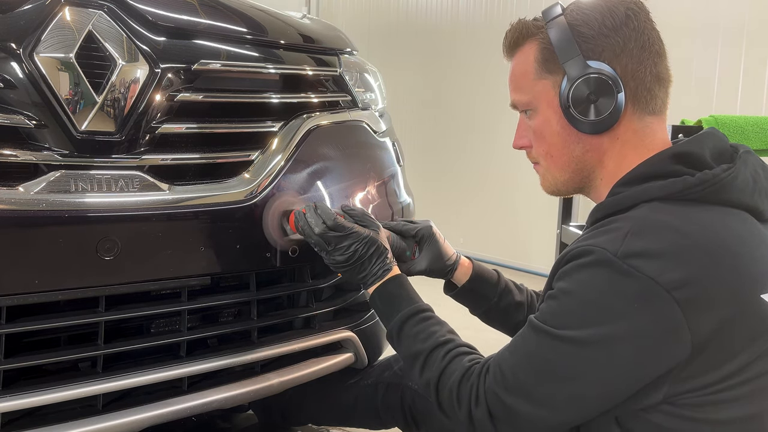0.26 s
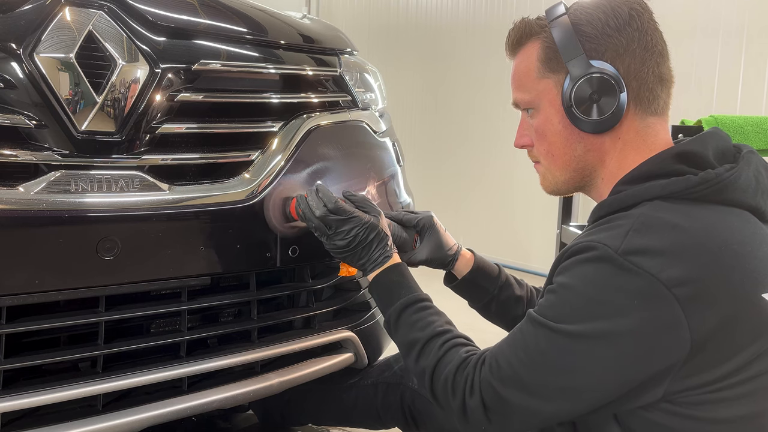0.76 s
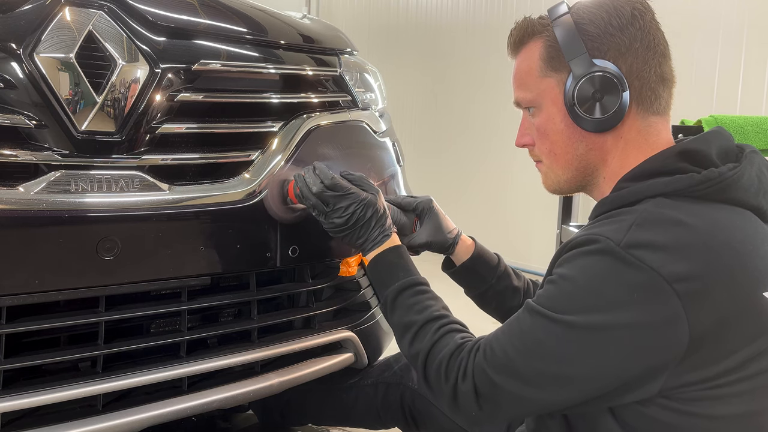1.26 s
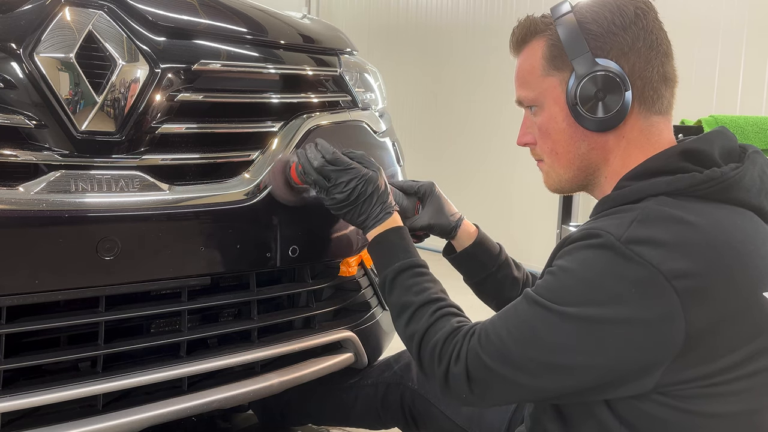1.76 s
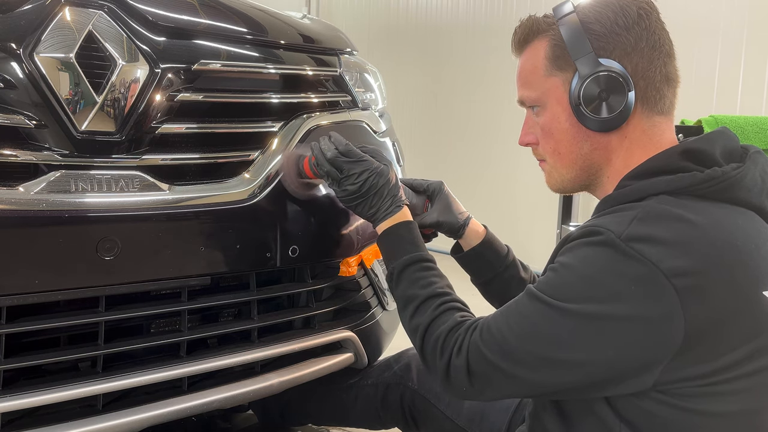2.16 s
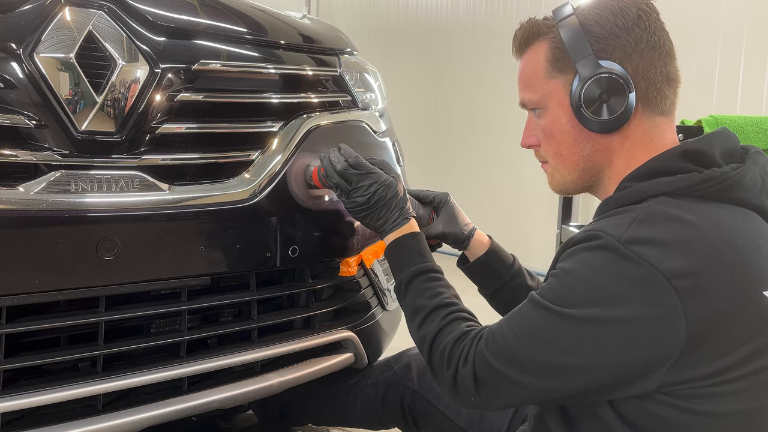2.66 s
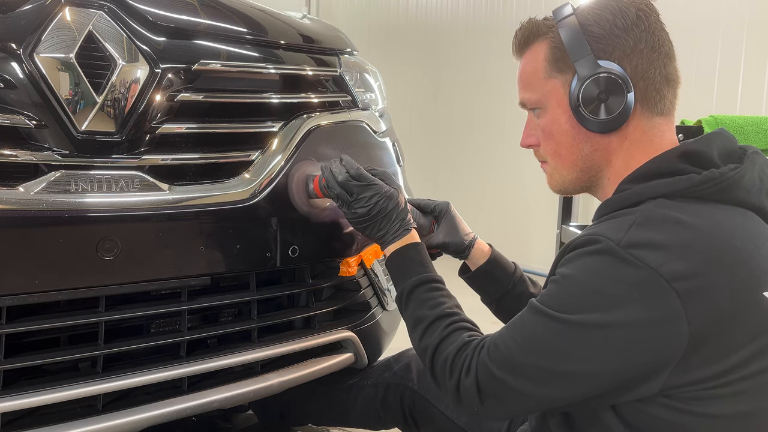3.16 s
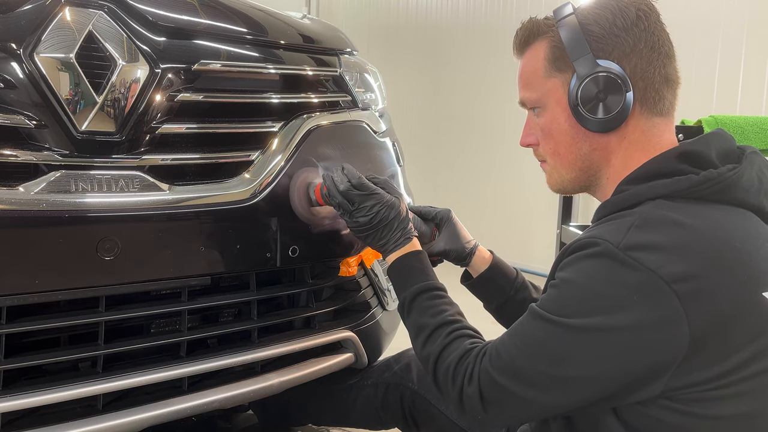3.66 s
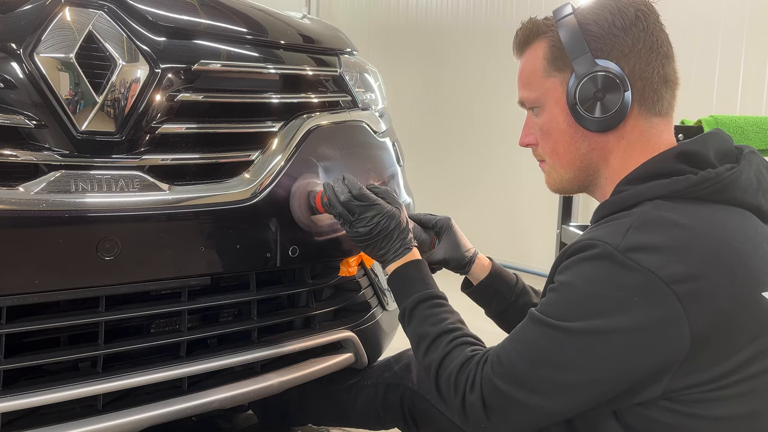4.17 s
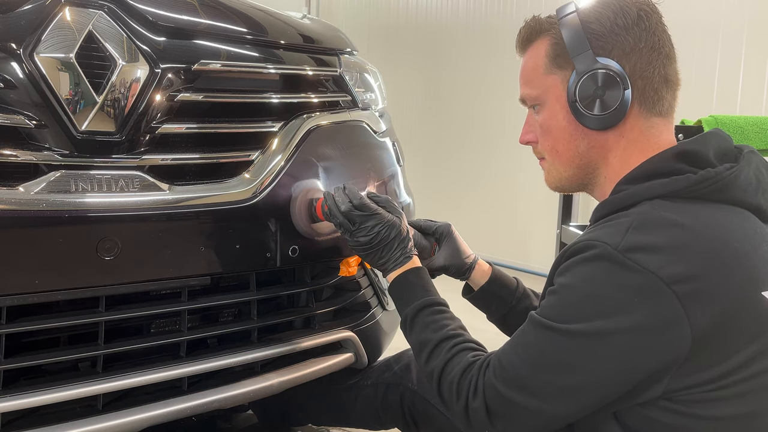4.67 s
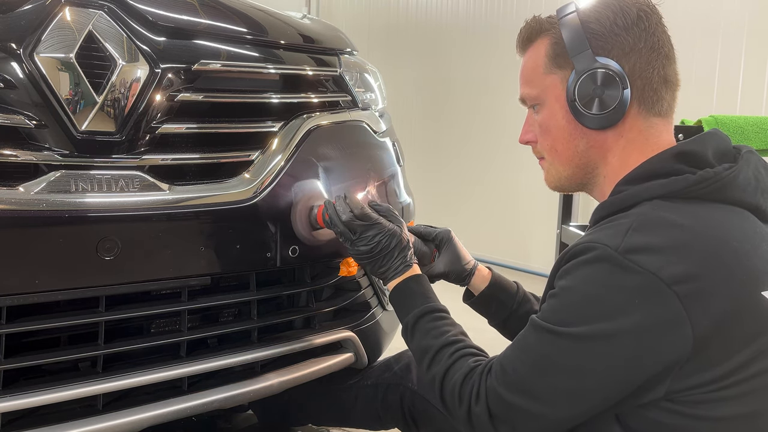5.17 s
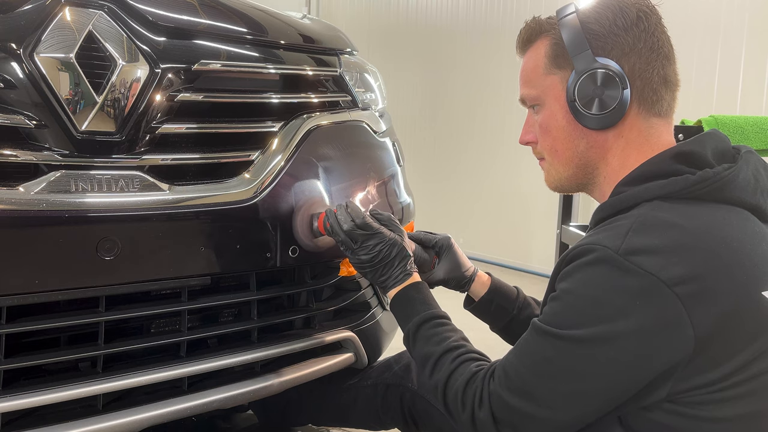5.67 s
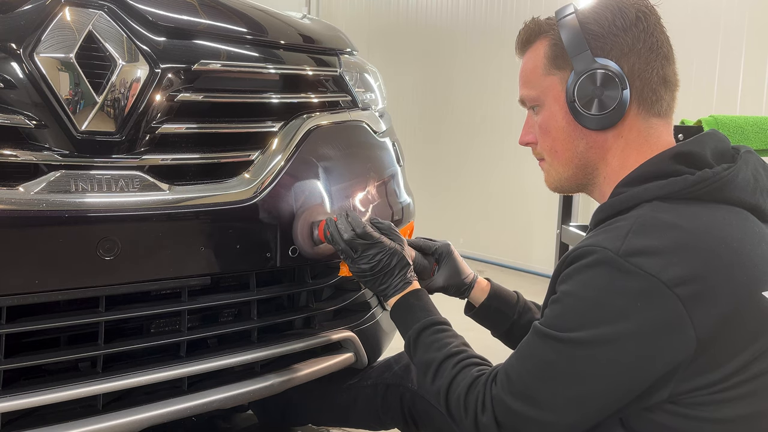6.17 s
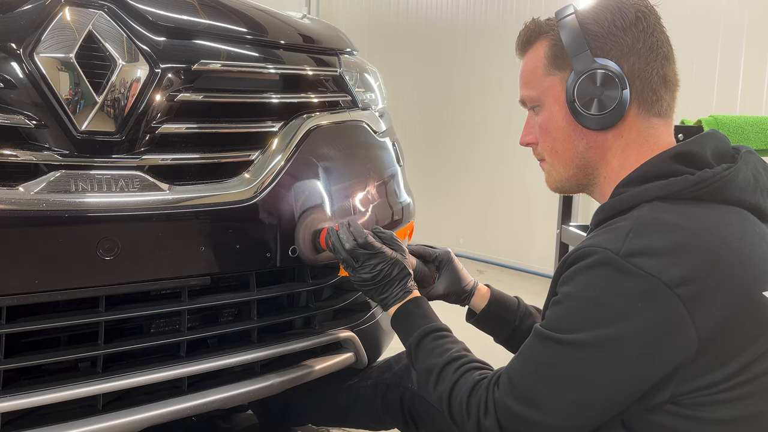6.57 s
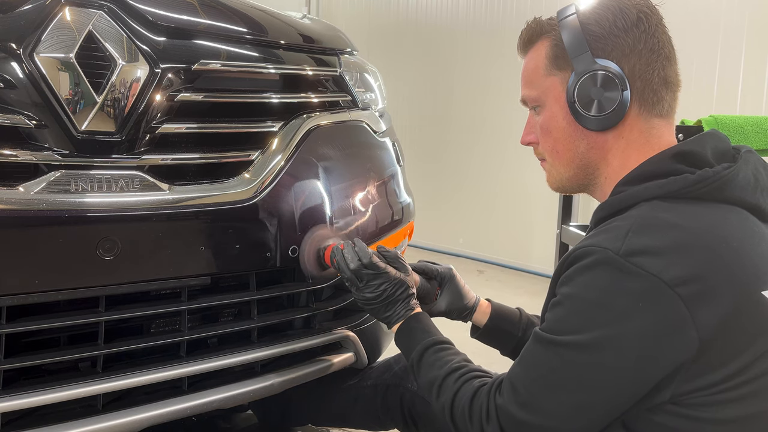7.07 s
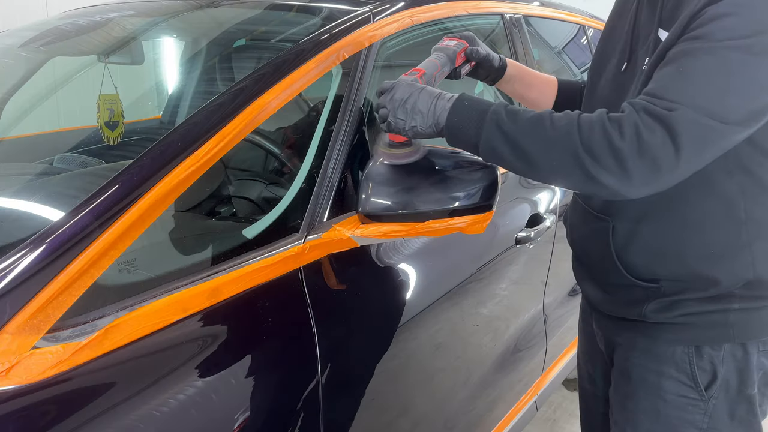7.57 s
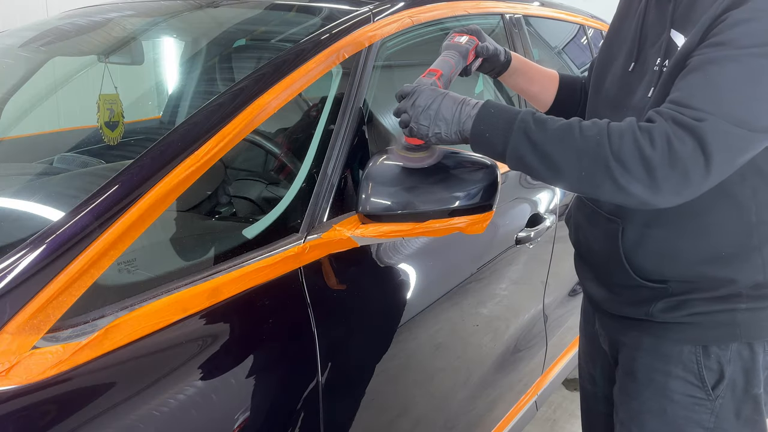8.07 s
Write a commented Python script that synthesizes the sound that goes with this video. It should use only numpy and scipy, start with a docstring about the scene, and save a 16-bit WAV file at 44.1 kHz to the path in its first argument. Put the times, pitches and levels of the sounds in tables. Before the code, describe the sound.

Close by in a garage, a small electric polisher works on car paint with a steady high whine, a rush of air from its vents and a fine gear buzz. The foam pad rubs rapidly against the bumper, and the low hum grows and eases as the pressure changes. For the last moment the tool is on the door mirror, where it sounds quieter, thinner and a touch lower in pitch, still running.

```python
"""A hand-held polisher whines on a car's bumper, then runs slower and lighter on the door mirror.
Its motor sings at the slot-passing frequency and drives an eccentric spindle through a gear pair.
The rotating unbalance hums, the gears buzz and tick, and the foam pad scrubs the paint once an orbit.
Turbulent cooling air hisses and whistles in the vents; the garage rumbles faintly underneath."""
import sys
import numpy as np
from scipy import signal
from scipy.fft import rfft, irfft, next_fast_len
from scipy.io import wavfile
from scipy.ndimage import uniform_filter1d

SR = 44100
rng = np.random.default_rng(int(sys.argv[2]) if len(sys.argv) > 2 else 0)


def log_audio(samples):
    """Write samples as a 16-bit WAV file to the path given in sys.argv[1]."""
    # one column per channel
    frames = np.atleast_2d(samples).T
    # limit to full scale, then quantise
    limited = np.clip(frames, -1, 1)
    pcm = np.round(limited * 32767).astype(np.int16)
    wavfile.write(sys.argv[1], SR, pcm)


N = 367353
T = np.arange(N) / SR
PINION_TEETH, WHEEL_TEETH, MOTOR_SLOTS = 8, 25, 12

# Slot-passing frequency of the motor: time_s, pitch_hz
SLOT_PITCH = [(0.25, 3262), (0.6, 3279), (2.1, 3285), (3.2, 3279), (4.0, 3291), (5.8, 3290), (7.35, 3274),
              (7.46, 3246), (7.95, 3216)]
# Distance of the pad from the stiff trim (0 = at the trim): time_s, reach_fraction
PAD_REACH = [(0.1, 0.65), (.5, 0.58), (.9, 0.41), (1.35, .22), (1.85, 0.05), (2.65, 0.15), (3.1, 0.16),
             (4.0, 0.26), (4.9, 0.43), (6.2, .62), (7.03, 0.96), (7.3, 0.93)]
# Pressure of the hand: time_s, pressure_fraction
HAND_PRESSURE = [(0, 0.06), (1.0, .45), (2.1, 0.8), (3.2, 0.32), (4.0, 0.71), (4.9, 1), (6.4, 0.66),
                 (7.2, 0.82)]
# Side turned to the listener (0 = vents, 1 = motor housing): time_s, facing_fraction
TOOL_FACING = [(0, 0.56), (.2, 0.89), (.8, 0.99), (1.18, .86), (1.75, 0.07), (2.75, .08), (3.45, .45),
               (4.05, 0.55), (4.45, 0.81), (5.05, 0.49), (5.5, 0.66), (6.4, 0.65), (6.8, 0.71),
               (7.05, 0.23), (7.3, 0.65)]

# Spectral shapes, each with the columns frequency_hz, relative_db
GARAGE_SPECTRUM = [(20, -12), (60, -8), (130, 4), (300, 8), (1000, -40), (8000, -32)]
AIR_BUMPER_SPECTRUM = [(530, -41), (900, -17.5), (1200, -17.5), (2120, -9), (3000, -5.5), (3700, -7),
                       (4670, -7), (5920, -13.5), (6750, -13.5), (7250, -16.5), (8400, -12), (10400, -13),
                       (11800, -17), (13500, -22), (15600, -23.5)]
AIR_MIRROR_SPECTRUM = [(530, -51), (900, -13), (978, -17), (1010, -14.5), (1580, -12.5), (1710, -9),
                       (2100, -11.5), (2900, -14), (3110, -10), (3300, -7), (3860, -10), (5260, -11.5),
                       (7250, -15.5), (10400, -14), (15600, -28)]
BUZZ_BUMPER_SPECTRUM = [(800, -39), (1050, -1.5), (1200, -1.5), (1600, 1), (1950, 6.5), (2500, 4),
                        (3000, 0), (3600, 6), (4100, 0), (4700, -4.5), (5500, -12)]
BUZZ_MIRROR_SPECTRUM = [(560, -40), (690, 0.5), (900, -18), (1200, -5), (1600, 5.5), (1750, -1), (2100, 4),
                        (2500, -6), (3400, -4), (4100, -2), (5500, -3)]
PANEL_GROWL_SPECTRUM = [(600, -34), (700, 0), (790, 5.5), (875, 2.5), (965, -3), (1050, -7), (1140, -17),
                        (1230, -12.5), (1400, -45), (2000, -35)]
FOAM_SCRUB_SPECTRUM = [(120, -24), (220, -28), (290, -1), (400, 0), (650, -1.5), (900, -9.5), (1300, -13.5),
                       (2500, -25)]
DRIVE_RATTLE_SPECTRUM = [(60, -16), (140, -12), (230, -5), (280, -4), (400, -4), (500, -1.5), (800, 3.5),
                         (1200, -5)]
PAD_RIM_SPECTRUM = [(700, -23), (950, -5), (1140, -7.5), (1300, 3), (1500, 2.5), (1750, -13.5),
                    (3400, -4.5), (4100, 4), (4650, 4.5), (5200, -10), (9000, -29)]

# Bearing tones: multiple_of_spindle_rate
BEARING_MULTIPLES = [.815, 2.63, 3.63, 4.27, 4.63, 5.63]
# Their strengths on the bumper and on the mirror: level_db
BEARING_BUMPER_LEVELS = [-79, -84, -70.5, -75.5, -77.5, -85]
BEARING_MIRROR_LEVELS = [-90, -82, -98, -77, -72.5, -94]
# Lower and upper modes of the gear head: frequency_hz, bandwidth_hz, relative_db
HEAD_LOW_MODES = [(8750, 220, 6), (8470, 350, 0.5)]
HEAD_HIGH_MODES = [(10160, 180, 4), (10470, 330, 5), (11700, 180, 2)]
# Strength of the gear head's ringing: time_s, gain_db
HEAD_GAIN = [(0.5, -63), (1.15, -65), (1.55, -63.5), (2.65, -62.5), (3.15, -64.5), (3.7, -59.5), (4.2, -58),
             (4.7, -62.5), (5.9, -60), (6.45, -63.5), (7.0, -61.5), (7.9, -67.5)]
# Panel response to the spindle's harmonics: order, trim_db, full_reach_db, full_pressure_db, mirror_db
PANEL_HARMONICS = [(2, -51.5, -2.5, -2, -71), (3, -71.5, 2.5, 14, -68), (4, -71.5, 3.5, 1, -69),
                   (5, -65.5, -1.5, 9, -66), (6, -68.5, 10.5, 1.5, -71), (7, -62, -6.5, 0.5, -76.5)]
# Lively or still spots of the panel that the pad crosses: centre_s, half_length_s, order, gain_db
PANEL_SPOTS = [(0.75, 0.41, 6, 7), (2.35, .35, 4, 8.5), (3.5, 1, 2, 2), (6.15, 0.89, 4, 9.5),
               (7.032, .075, 2, -16)]
# Weak motor tones: multiple_of_motor_rate, level_db
MOTOR_HARMONICS = [(6, -73), (8, -70)]
# Brief swells of the whine: centre_s, half_length_s, gain_db
WHINE_FLARES = [(2.202, 0.21, 6.5), (3.433, 0.05, 2.5), (3.79, 0.065, 5.5), (4.822, 0.04, 2.5),
                (5.21, 0.044, 4)]

# Levels under load (the middle two add to the first): trim_db, full_reach_db, full_pressure_db, mirror_db
SCRUB_LOAD, GROWL_LOAD = (-61, -0.1, 1.4, -70), (-71.5, 5.5, 6.5, -75)
HISS_LOAD, HISS_TREBLE_LOAD = (-48.5, 0.2, 0, -52.3), (-51, -0.2, 0, -56.5)
# Levels of the directional sounds: vents_facing_db, housing_facing_db, mirror_db
WHINE_BEAM, OCTAVE_BEAM, VENT_BEAM = (-62.5, -48.5, -59.5), (-65, -72, -71), (-62.5, -68.5, -67.5)


def amp(db):
    """Amplitude ratio of a level in decibels."""
    return 10 ** (np.asarray(db) / 20)


def unit(x):
    """Normalisation to rms 1."""
    return x / np.sqrt(np.mean(x ** 2) + 1e-20)


def curve(rows):
    """Linear interpolation of time_s, value rows at every sample."""
    return np.interp(T, *np.transpose(rows))


def swell(centre_s, half_length_s):
    """A Gaussian bump of height 1."""
    return np.exp(-np.minimum(((T - centre_s) / half_length_s) ** 2, 20))


def drift(per_s):
    """Band-limited noise of rms near 1 that changes about per_s times a second."""
    smooth = signal.resample_poly(rng.standard_normal(4096), 8, 1)
    return np.interp(T * per_s * 8, np.arange(len(smooth)), smooth)


def tone(turns):
    """A sinusoid of rms 1 and random starting phase."""
    return np.sqrt(2) * np.sin(2 * np.pi * (turns + rng.random()))


def colour(x, spectrum):
    """Filtering by a spectral shape drawn on a log-frequency axis; rms 1."""
    size = next_fast_len(N)
    hz, db = np.transpose(spectrum)
    bins_hz = np.fft.rfftfreq(size, 1 / SR)
    gain = amp(np.interp(np.log(bins_hz + 1), np.log(hz), db))
    return unit(irfft(rfft(x, size) * gain, size)[:N])


def resonate(x, hz, width_hz):
    """Forced response of one damped resonator; rms 1."""
    return unit(signal.lfilter(*signal.iirpeak(hz, hz / width_hz, SR), x))


def narrow_noise(hz, width_hz):
    """White noise through two like resonators in series; rms 1."""
    return resonate(resonate(rng.standard_normal(N), hz, width_hz), hz, width_hz)


def once_a_turn(turns, sharpness):
    """A periodic pulse that peaks at the start of each turn."""
    return np.exp(sharpness * (np.cos(2 * np.pi * turns) - 1))


def tooth_throb(spindle, depth):
    """Amplitude modulation near 11 Hz: the same two teeth meet every eighth turn of the spindle."""
    return 1 + depth * np.cos(2 * np.pi * spindle / PINION_TEETH)


def worn_surface(turns, change_per_s, harmonics):
    """Roughness that repeats each turn gives a harmonic series, whose balance drifts slowly; rms 1."""
    size = 65536
    place = (turns * size).astype(int) % size
    roughness = 0
    for _ in range(4):
        profile = irfft(np.r_[0, np.exp(2j * np.pi * rng.random(harmonics))], size)
        roughness += drift(change_per_s) * profile[place]
    running_rms = np.sqrt(uniform_filter1d(roughness ** 2, size=4096))
    return unit(roughness / running_rms)


def friction(spindle, periodic_share):
    """Sliding contact: a share of the power repeats with each turn, the rest is white noise."""
    periodic = np.sqrt(periodic_share) * worn_surface(spindle, 2.026, harmonics=145)
    return periodic + np.sqrt(1 - periodic_share) * rng.standard_normal(N)


def blend(on_mirror, bumper, mirror):
    """Linear crossfade from the bumper's value to the mirror's."""
    return (1 - on_mirror) * bumper + on_mirror * mirror


def loaded_db(load, trim_db, full_reach_db, full_pressure_db, mirror_db):
    """Mechanical loading: the level depends on where the pad sits and how hard it is pressed."""
    reach, pressure, on_mirror = load
    return blend(on_mirror, trim_db + full_reach_db * reach + full_pressure_db * pressure, mirror_db)


def beamed_db(facing, on_mirror, vents_db, housing_db, mirror_db):
    """Directivity: the level of a high sound depends on which way the tool faces."""
    return blend(on_mirror, vents_db + (housing_db - vents_db) * facing, mirror_db)


def garage_rumble(level_db=-76):
    """Ambient noise of the room, strongest at low frequencies."""
    return amp(level_db) * colour(rng.standard_normal(N), GARAGE_SPECTRUM)


def bodywork_reflections(hiss, depth_db=1.32):
    """Interference from the bodywork, drawn as random patches of gain in time and frequency."""
    spectrogram = signal.stft(hiss, nperseg=1024)[2]
    patches = rng.standard_normal(spectrogram.shape)
    for _ in range(2):
        patches = uniform_filter1d(patches, size=5, axis=0)
        patches = uniform_filter1d(patches, size=45, axis=1)
    return signal.istft(spectrogram * amp(depth_db * unit(patches)), nperseg=1024)[1][:N]


def cooling_air(spindle, motor, load, gust_db=0.5):
    """Turbulence and brush hiss: broadband noise, modulated by each turn of motor and spindle."""
    reach, pressure, on_mirror = load
    air_on_mirror = np.minimum(2 * on_mirror, 1)  # the hiss drops sooner than the hum
    air_load = reach, pressure, air_on_mirror
    chop = 1 + 0.16 * np.cos(2 * np.pi * motor) + 0.13 * np.cos(2 * np.pi * spindle)
    flow = chop * rng.standard_normal(N)
    hiss = blend(air_on_mirror, colour(flow, AIR_BUMPER_SPECTRUM), colour(flow, AIR_MIRROR_SPECTRUM))
    below_7khz = signal.sosfiltfilt(signal.butter(2, 7000, fs=SR, output="sos"), hiss)
    body = amp(loaded_db(air_load, *HISS_LOAD)) * below_7khz
    treble = amp(loaded_db(air_load, *HISS_TREBLE_LOAD)) * (hiss - below_7khz)
    return amp(gust_db * drift(30)) * bodywork_reflections(body + treble)


def vent_whistle(motor, facing, on_mirror, blades_db=-9):
    """Flow excites a resonance of the vents; the fan adds a faint blade-passing tone."""
    whistle = narrow_noise(hz=5450, width_hz=260)
    blades = (1 + 0.9 * drift(30)) * tone(20 * motor + 0.14 * drift(40))
    return amp(beamed_db(facing, on_mirror, *VENT_BEAM)) * (whistle + amp(blades_db) * blades)


def bearing_tones(spindle, on_mirror, waver=0.37):
    """Beating: the cage slips against the spindle, so its tones fall between the hum's harmonics."""
    out = 0
    for multiple, *levels_db in zip(BEARING_MULTIPLES, BEARING_BUMPER_LEVELS, BEARING_MIRROR_LEVELS):
        gain = amp(blend(on_mirror, *levels_db)) * (1 + waver * drift(8))
        out += gain * tone(multiple * spindle + 0.15 * drift(5))
    return out


def gear_ticks(spindle, motor, load):
    """Backlash closes once an orbit; these impacts and the sliding teeth excite the gear head's modes."""
    reach, _, on_mirror = load
    low_db = curve(HEAD_GAIN)
    high_db = low_db + blend(on_mirror, -12 * reach, -3)
    # Hardest when the motor's turn falls in step.
    force = tooth_throb(spindle, 0.15) * (1 + 0.88 * np.cos(2 * np.pi * motor))
    orbit_starts = np.diff(np.floor(spindle), prepend=0)
    knocks = unit(orbit_starts * force * rng.choice([-1, 1], N))
    sliding_force = force * (1 + 0.5 * once_a_turn(spindle, 2.3))
    whirr = unit(sliding_force * friction(spindle, periodic_share=0.43))
    out = 0
    for modes, gain_db, knock_db in (HEAD_LOW_MODES, low_db, -5), (HEAD_HIGH_MODES, high_db, -8):
        drive = amp(knock_db) * knocks + whirr
        ringing = sum(amp(db) * resonate(drive, hz, width_hz) for hz, width_hz, db in modes)
        out += amp(gain_db) * drive.std() * unit(ringing)
    return out


def gear_buzz(spindle, load, bumper_db=-57, mirror_db=-58):
    """Periodic forcing by the wheel's uneven teeth: a buzz, and a growl in the pressed panel."""
    _, _, on_mirror = load
    teeth = worn_surface(spindle, 1.522, harmonics=64)
    bumper_buzz = amp(bumper_db) * colour(teeth, BUZZ_BUMPER_SPECTRUM)
    mirror_buzz = amp(mirror_db) * colour(teeth, BUZZ_MIRROR_SPECTRUM)
    growl = colour(worn_surface(spindle, 2.5, harmonics=20), PANEL_GROWL_SPECTRUM)
    return blend(on_mirror, bumper_buzz, mirror_buzz) + amp(loaded_db(load, *GROWL_LOAD)) * growl


def pad_scrub(spindle, load, rattle_db=-5, bend_reach=0.59):
    """Friction of foam on paint peaks once an orbit; the drive's rattle repeats as the same teeth meet."""
    reach, pressure, on_mirror = load
    stroke = (0.97 + once_a_turn(spindle, 1.7)) * tooth_throb(spindle, 0.053)
    rub = colour(stroke * rng.standard_normal(N), FOAM_SCRUB_SPECTRUM)
    tooth_pairs = worn_surface(spindle / PINION_TEETH, 0.663, harmonics=110)
    rattle = colour(stroke * tooth_pairs, DRIVE_RATTLE_SPECTRUM)
    rim = colour(friction(spindle, periodic_share=0.65), PAD_RIM_SPECTRUM)
    # The pad's rim rubs most where it meets the bend of the bumper.
    rim_db = blend(on_mirror, -52 - 19 * abs(reach - bend_reach) - 6.5 * pressure, -75)
    return amp(loaded_db(load, *SCRUB_LOAD)) * (rub + amp(rattle_db) * rattle) + amp(rim_db) * rim


def spindle_hum(spindle, load, full_reach_db=-38.5, mirror_db=-55):
    """Rotating unbalance: the eccentric shakes tool and panel at the spindle rate and its harmonics."""
    reach, _, on_mirror = load
    out = blend(on_mirror, amp(full_reach_db) * reach, amp(mirror_db)) * tone(spindle)
    throb_depth = blend(on_mirror, 0.012, 0.15)
    for order, *levels_db in PANEL_HARMONICS:
        waver = 1 + 0.061 * np.log(order) * drift(30)
        throb = tooth_throb(spindle, throb_depth * (order - 2))
        spots_db = sum(db * swell(centre_s, half_s)
                       for centre_s, half_s, spot_order, db in PANEL_SPOTS if spot_order == order)
        wander_db = 0.76 * np.log(order - 1) * drift(3)
        panel_db = loaded_db(load, *levels_db) + spots_db + wander_db
        out += amp(panel_db) * waver * throb * tone(order * spindle)
    return out


def motor_whine(motor, spindle, facing, on_mirror, dip_db, flicker_db=0.96):
    """Slot passing sings twelve times a turn, beside a housing resonance; rotor unbalance drones."""
    flares_db = sum(db * swell(centre_s, half_s) for centre_s, half_s, db in WHINE_FLARES)
    whine_db = beamed_db(facing, on_mirror, *WHINE_BEAM) + flares_db + flicker_db * drift(10) + dip_db
    octave_db = beamed_db(facing, on_mirror, *OCTAVE_BEAM)
    rotor_db = blend(on_mirror, -64, -80)
    slot_turns = MOTOR_SLOTS * motor + 0.044 * drift(70)
    flutter = 1 + 0.22 * drift(45) + 0.12 * np.cos(2 * np.pi * spindle)
    slots = amp(whine_db) * flutter * tone(slot_turns)
    housing = amp(0.5 * whine_db - 37) * narrow_noise(hz=3360, width_hz=250)  # less directional
    octave = amp(octave_db) * (1 + 0.13 * drift(40)) * tone(2 * slot_turns)
    rotor = amp(rotor_db) * (1 + 0.19 * drift(5.5)) * tone(motor)
    weak_tones = sum(amp(db) * (1 + 0.3 * drift(6.9)) * tone(multiple * motor + 0.12 * drift(25))
                     for multiple, db in MOTOR_HARMONICS)
    return slots + housing + octave + rotor + weak_tones


def scene(move_s=(7.24, 7.44), tool_dip_db=-1, whine_dip_db=-6):
    """Superposition: one motor speed drives every part, and the hand's pose sets their levels."""
    on_mirror = np.interp(T, move_s, [0, 1])
    moving = np.sin(np.pi * on_mirror)  # the level dips briefly between bumper and mirror
    load = curve(PAD_REACH), curve(HAND_PRESSURE), on_mirror
    facing = curve(TOOL_FACING)
    slot_hz = curve(SLOT_PITCH) * (1 + 0.00058 * drift(20) + 0.0006 * drift(5))
    motor = np.cumsum(slot_hz) / MOTOR_SLOTS / SR  # shaft angles are in turns
    spindle = motor * PINION_TEETH / WHEEL_TEETH
    tool = cooling_air(spindle, motor, load) + vent_whistle(motor, facing, on_mirror)
    tool += bearing_tones(spindle, on_mirror) + gear_ticks(spindle, motor, load) + gear_buzz(spindle, load)
    tool += pad_scrub(spindle, load) + spindle_hum(spindle, load)
    tool += motor_whine(motor, spindle, facing, on_mirror, whine_dip_db * moving)
    mono = garage_rumble() + amp(tool_dip_db * moving) * tool
    return np.array([mono, mono])


def record(dry, cutoff_hz=15750):
    """Band limiting: a steep low-pass filter acts alike on both channels."""
    lowpass = signal.firwin(1023, cutoff_hz, window=("kaiser", 9), fs=SR)
    return signal.oaconvolve(dry, lowpass[None], "same")


dry = scene()
out = record(dry)
log_audio(out)
```